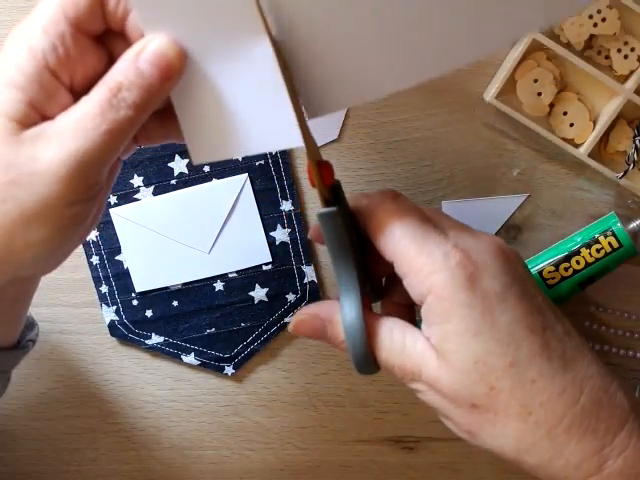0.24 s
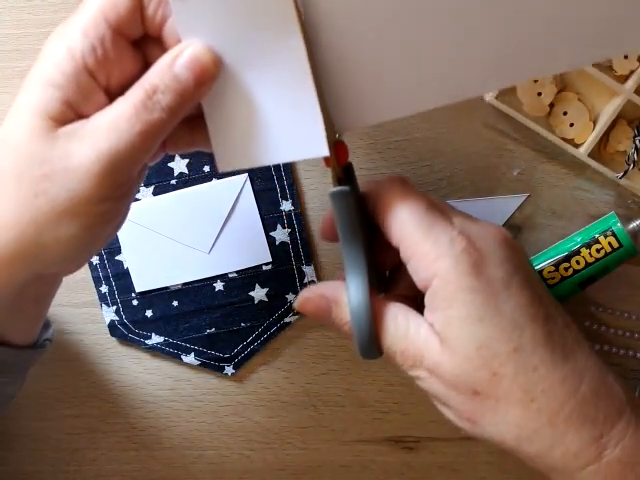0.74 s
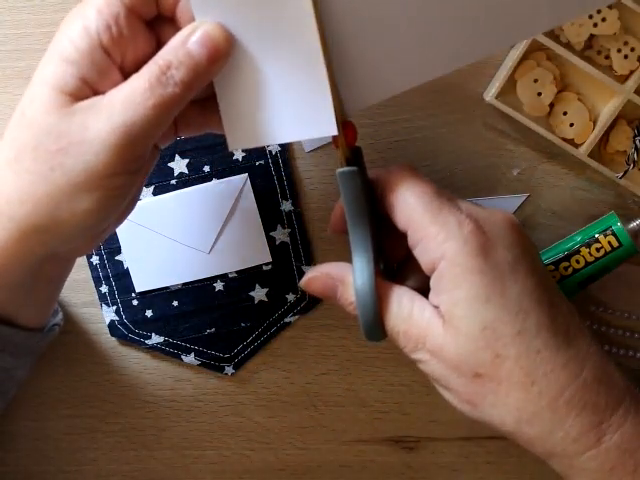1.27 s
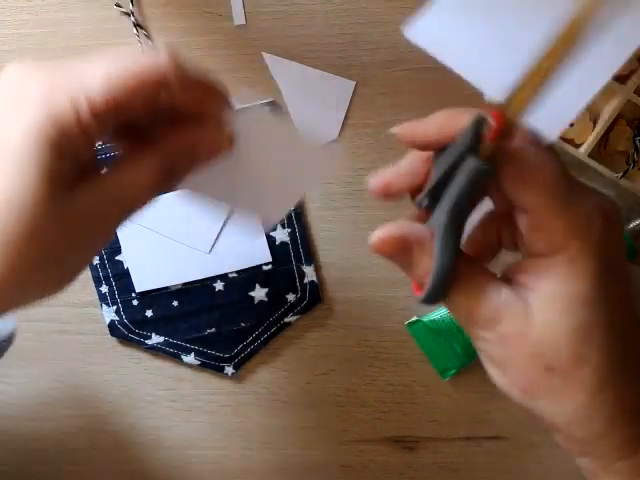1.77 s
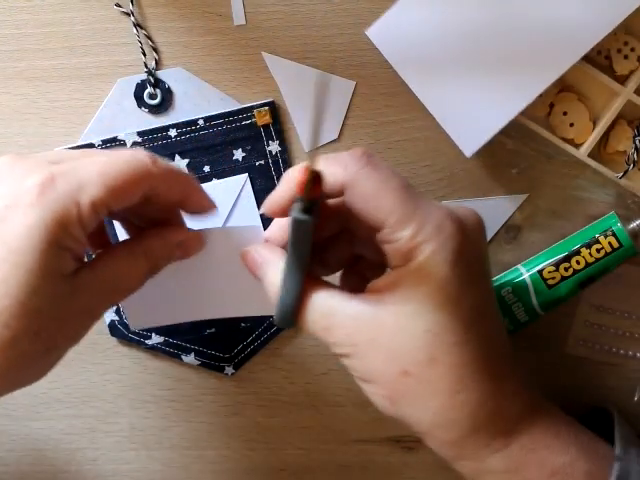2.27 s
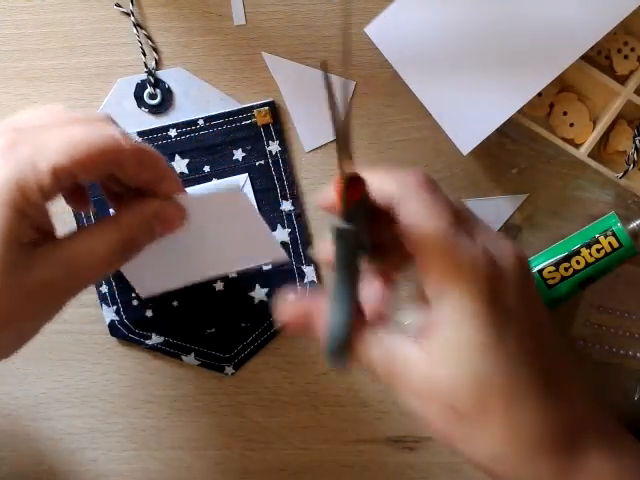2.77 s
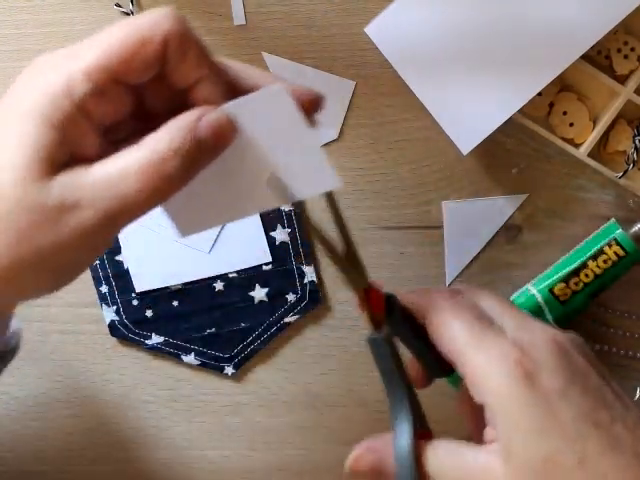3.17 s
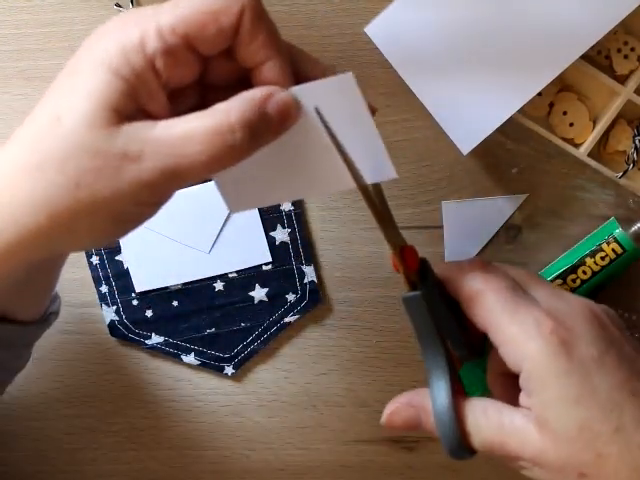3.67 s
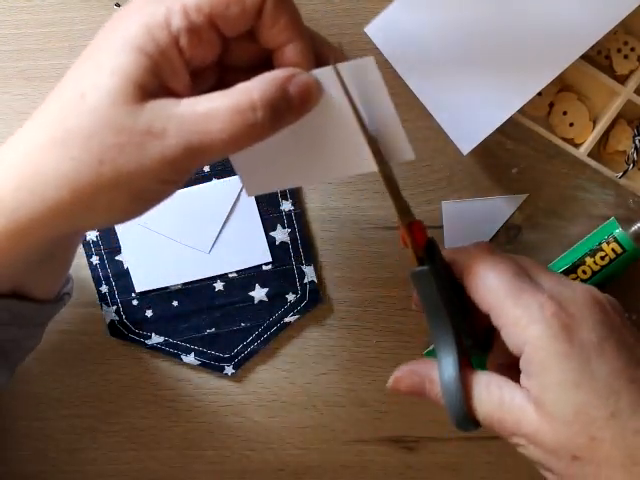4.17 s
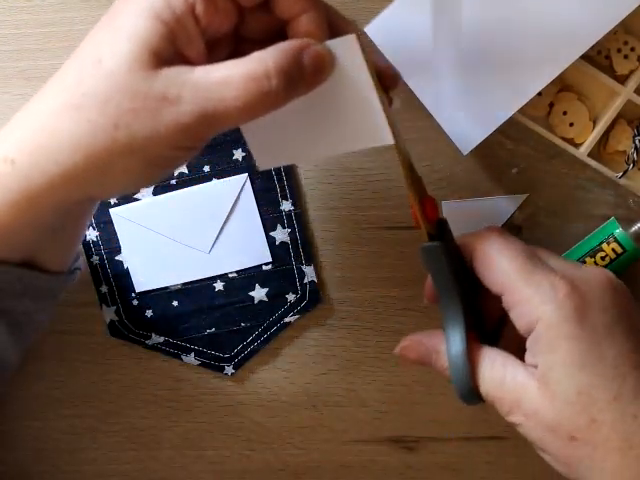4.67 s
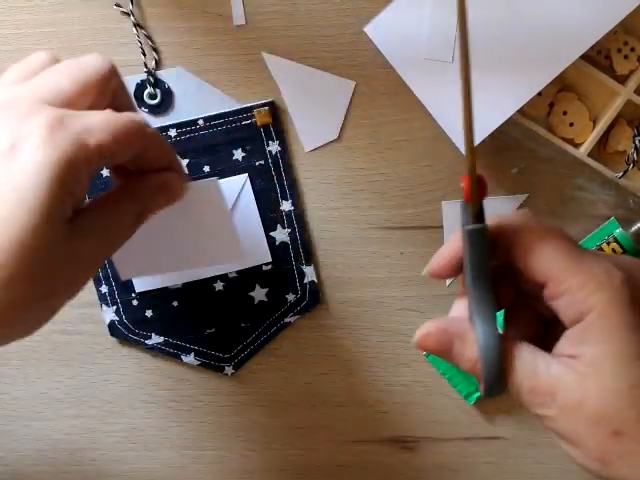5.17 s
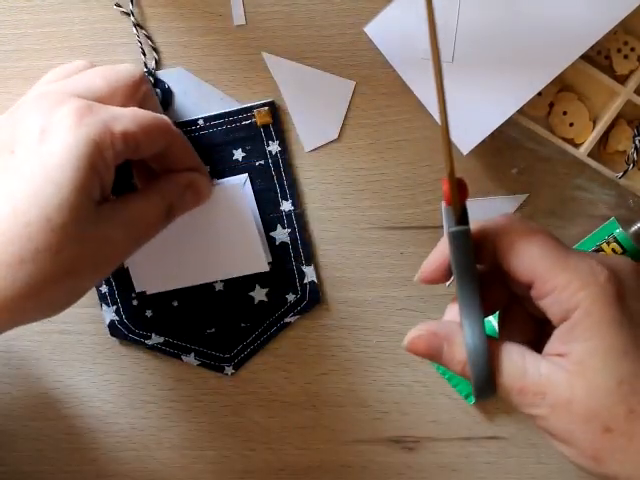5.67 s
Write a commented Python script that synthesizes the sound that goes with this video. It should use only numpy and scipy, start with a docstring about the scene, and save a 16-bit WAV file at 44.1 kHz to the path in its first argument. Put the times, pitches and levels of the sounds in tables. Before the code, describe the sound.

Close up in a small quiet room, scissors crunch unevenly through stiff card and close with a loud double snip near 1.5 seconds. The loose card flexes and taps, sliding softly over cloth and wood. A hand bumps the table with low thuds around 3.1 seconds. A second, quieter and finer cut starts after 4.2 seconds, cracks through and snaps shut near 4.8, followed by card taps and a soft rub.

```python
"""Scissors make two cuts through stiff card, close above a wooden table in a small room.
The card gives way in short crunching steps: noise bursts ring the held card. Each cut ends in a loud snip,
where bursts ring the steel. A fine rasp and a low grip rumble follow each run of crunching steps.
Around the cuts, bursts ring the loose card as it is flexed, put down and picked up, and the table as a hand bumps it.
Coloured noise makes the sliding and the room tone, with a faint hum; noise-built echoes make the room."""
import sys
import numpy as np
from scipy import signal
from scipy.fft import rfft, irfft, next_fast_len
from scipy.io import wavfile

SR = 44100
rng = np.random.default_rng(int(sys.argv[2]) if len(sys.argv) > 2 else 0)


def unload_wav(signal):
    """Save mono or channel-first audio to the path in sys.argv[1] as 16-bit WAV at rate SR, clipped to [-1, 1]."""
    wavfile.write(
        sys.argv[1],
        SR,
        np.round(np.clip(np.atleast_2d(signal).T, -1, 1) * 32767).astype(np.int16),
    )


N = 261689   # samples
TIME = np.arange(N) / SR   # seconds

# Every event level below is relative: contact balances and source trims are added to it.
# Runs of crunching steps within the cuts, some a single step: (t/s, travel/s, number of steps, step length/s,
# first level/dB, last level/dB, weight (extra bass) level/dB, brightness (extra treble) level/dB)
CRUNCH_RUNS = [(0.025, 0.0091, 1, 0.0056, -42.5, -41, -0.5, -0.5),
               (0.0503, 0.0282, 2, 0.0036, -41.5, -42, 3.5, 3),
               (0.098, 0.024, 2, 0.0049, -45.5, -44.5, 3, 3),
               (0.7768, 0.072, 3, 0.0067, -48.5, -44.5, 0.5, 2),
               (0.981, 0.002, 1, 0.0037, -45.5, -45, 1.5, 1.5),
               (1.0473, 0.027, 2, 0.0053, -43, -45, 6, 1.5),
               (1.1992, 0.0465, 2, 0.0021, -43.5, -46.5, -2, -5.5),
               (1.3, 0.031, 2, 0.0028, -38, -39, -4, -10.5), (4.217, 0.073, 3, 0.009, -61, -59.5, 4, 10),
               (4.329, 0.0416, 2, 0.0052, -52, -50.5, -3, 9), (4.4066, 0, 1, 0.0087, -56, -56, 4, 6),
               (4.4362, 0.077, 3, 0.0036, -48, -48, 0, 7), (4.5384, 0, 1, 0.004, -43, -44, -1, 1),
               (4.5724, 0, 1, 0.0013, -41, -41, -4, -6)]
# Where each cut begins and how high the card rings there: (t/s, f/Hz)
CUTS = [(0.0, 884), (4.2, 940)]
RING_RISE_HZ_PER_S = 357   # the card rings higher as the cut advances
CRUNCH_BALANCE = (-7.5, -1.5, -2.5, -11)   # dB in bass, low middle, high middle, treble; same order below


def crunch_steps(jitter_s=0.0004, spread_db=0.6):
    """The blades stick and slip, at a nearly steady pace within a run; every slip breaks a bundle of fibres."""
    for start, travel, steps, length, first_db, last_db, weight_db, bright_db in CRUNCH_RUNS:
        cut_start, cut_hz = min(CUTS, key=lambda cut: abs(cut[0] - start))
        for along in np.linspace(0, 1, round(steps)):
            late, strong = rng.standard_normal(2)
            s = max(start + along * travel + jitter_s * late, 0)
            db = first_db + along * (last_db - first_db) + spread_db * strong
            ring_hz = cut_hz + RING_RISE_HZ_PER_S * (s - cut_start)
            yield contact(s, length, ring_hz, db, CRUNCH_BALANCE, weight_db, bright_db)


# Resonances of the card held in the hand: (f/Hz, width/Hz, level/dB)
HELD_CARD_MODES = [(490, 59, 10), (660, 69, 9.5), (860, 55, 4), (983, 38, 9.5), (1147, 124, 4),
                   (1705, 140, 1.5), (2460, 1300, 8.5), (3340, 490, 7), (9300, 1300, 8.5),
                   (11900, 2500, 11.5)]


def crunching():
    """Breaking fibres shake the held card, which rings at its own pitches."""
    crunch = bursts(crunch_steps(), HELD_CARD_MODES, grit_db=7.5, crack_db=-9.5, ring_db=3.0, ring_width=140,
                    low_hz=370, dull_hz=14000, thud_db=-14, rise_share=0.6)
    return from_db(-0.95) * crunch


# The end of each cut: (tear t/s, tear level/dB, crack level/dB, slam t/s, slam level/dB,
# rebound t/s, rebound level/dB, brightness level/dB)
SNIPS = [(1.4898, -30, -36, 1.5319, -20, 1.5384, -20.5, -3),
         (4.6391, -38, -33.5, 4.7712, -21.5, 4.7815, -40, 4.5)]
# The phases of a snip: (length/s, ringing f/Hz)
TEAR, CRACK, SHEAR = (0.0045, 1850), (0.00106, 2550), (0.0035, 2800)
SLAM, REBOUND = (0.0008, 2580), (0.00035, 2060)
TEAR_BALANCE, CRACK_BALANCE = (-6, -1.5, 0.5, -10), (-13.5, -18, -0.5, -14)
SHEAR_BALANCE, SLAM_BALANCE = (-5, 5, -2, 2), (-13.5, -10.5, 0, -5)
REBOUND_BALANCE = (-24, -8.5, 2, -40)
CRACK_LAG_S = 0.0039   # the last fibres crack just after the tear begins
SHEAR_LEAD_S, SHEAR_DB = 0.003, -13   # steel slides on steel before the slam; level against the slam


def snip_phases():
    """The edge tears and cracks, the freed blades shear past each other, slam shut and rebound."""
    for tear_s, tear_db, crack_db, slam_s, slam_db, rebound_s, rebound_db, bright_db in SNIPS:
        yield contact(tear_s, *TEAR, tear_db, TEAR_BALANCE, bright_db=bright_db)
        yield contact(tear_s + CRACK_LAG_S, *CRACK, crack_db, CRACK_BALANCE, bright_db=bright_db)
        yield contact(slam_s - SHEAR_LEAD_S, *SHEAR, slam_db + SHEAR_DB, SHEAR_BALANCE, bright_db=bright_db)
        yield contact(slam_s, *SLAM, slam_db, SLAM_BALANCE, bright_db=bright_db)
        yield contact(rebound_s, *REBOUND, rebound_db, REBOUND_BALANCE, bright_db=bright_db)


# Resonances of the scissors: (f/Hz, width/Hz, level/dB)
SCISSOR_MODES = [(471, 38, 15.5), (616, 77, 8.5), (804, 120, -1), (986, 74, 0), (1327, 42, 6.5),
                 (1534, 160, 1.5), (1970, 100, 4), (2500, 130, 5.5), (2660, 200, 5), (3630, 520, -0.5),
                 (5100, 500, -13), (8800, 1100, -10)]


def snipping():
    """The blades break through and close, and the steel rings."""
    snip = bursts(snip_phases(), SCISSOR_MODES, grit_db=4.0, crack_db=-7.5, ring_db=0.5, ring_width=600,
                  low_hz=290, dull_hz=6800, thud_db=-14, rise_share=0.45)
    return from_db(-0.5) * snip


RUN_FADE_S = 0.044   # fade in and fade out around each run of steps


def along_crunch_runs(db, per_brightness):
    """Gain over time of a sound that lasts through each run of steps and grows with its brightness."""
    gain = np.zeros(N)
    for start, travel, *_, bright_db in CRUNCH_RUNS:
        level = from_db(db + per_brightness * bright_db)
        gain += level * swell(start - RUN_FADE_S / 2, RUN_FADE_S, travel, RUN_FADE_S)
    return gain


# Colour of card scraping on steel, relative power per Hz: (f/Hz, level/dB)
RASP_COLOUR = [(3000, -29), (4800, -3), (6200, 3), (7600, -8), (9500, 1), (11000, -27), (16000, -26)]
RASP_DB, RASP_PER_BRIGHTNESS = -67.5, 0.88   # base level; dB more per dB of brightness


def rasping(patchy_db=8.5, patch_hz=160):
    """The cut edge scrapes along the steel with a fine bright grain."""
    patches = rms_one(butter(rng.standard_normal(N), patch_hz, "low"))
    grain = from_db(patchy_db * np.tanh(patches))
    return along_crunch_runs(RASP_DB, RASP_PER_BRIGHTNESS) * grain * diffuse_noise(RASP_COLOUR)


GRIP_DB, GRIP_PER_BRIGHTNESS = -69, 0.66   # base level; dB more per dB of brightness


def grip():
    """Low rumble of the hand on the handles."""
    rumble = rms_one(butter(rng.standard_normal(N), [72, 135], "band"))
    return along_crunch_runs(GRIP_DB, GRIP_PER_BRIGHTNESS) * rumble


# Loose card flaps and touches down; weight lifts the lows, sharpness the treble:
# (t/s, length/s, ringing f/Hz, level/dB, weight level/dB, sharpness level/dB)
CARD_TAPS = [(0.3898, 0.0081, 2280, -43.5, 3, 7), (0.41, 0.016, 660, -45, 10, 10),
             (0.459, 0.008, 1040, -33, 7.5, 7), (0.4857, 0.0022, 473, -50, 16.5, 4),
             (1.6863, 0.009, 2000, -47.5, 1, -6), (1.701, 0.0056, 1400, -39.5, 5, -4),
             (1.8211, 0.011, 5300, -40, -6, 8), (1.8522, 0.0019, 2600, -30, 2, -7),
             (1.8654, 0.0017, 2070, -30, 1, -3), (1.913, 0.0015, 1810, -30, -7, 3),
             (1.9248, 0.0029, 1930, -44, 14, 17), (1.9578, 0.0035, 2000, -42, 12, -7),
             (1.982, 0.003, 1790, -40, 0.5, -7), (2.1144, 0.0095, 1650, -32, -7, 0),
             (2.1216, 0.0024, 1731, -28, -3, 1), (2.1321, 0.0034, 1710, -35, -1, 8),
             (2.326, 0.0015, 1800, -54.5, 0, 25.5), (2.509, 0.0025, 1870, -43, -13, -9),
             (2.524, 0.0011, 2030, -50, -4, 14), (2.7425, 0.0024, 2340, -50.5, -3.5, -10),
             (2.8647, 0.0032, 1470, -42, -3, 11), (2.8973, 0.0012, 3580, -58.5, -4, 31.5),
             (4.8457, 0.0029, 1710, -37, -11, 4), (4.859, 0.011, 1690, -35.5, -4.5, 8.5),
             (4.924, 0.0061, 2280, -46, -5, -1)]
# The card flexes with a run of faint ticks: (t/s, length/s, first level/dB, last level/dB)
FLEXES = [(0.3166, 0.022, -53, -51.5), (1.7684, 0.031, -47, -44), (2.05, 0.032, -50, -52),
          (2.1685, 0.0592, -41.5, -50), (2.4185, 0.0021, -53.5, -53)]
TAP_BALANCE, TICK_BALANCE = (-10, -6, 0, -20), (-9.5, -6.5, 0.5, -34)
TICKS_PER_S, TICK_S, TICK_SPREAD_DB = 45, 0.0027, 0.8
TICK_HZ, TICK_SPREAD_OCTAVES = 2120, 0.24


def card_contacts():
    """Single taps of the loose card, and the ticks of its flexing."""
    for s, length, ring_hz, db, weight_db, sharp_db in CARD_TAPS:
        yield contact(s, length, ring_hz, db, TAP_BALANCE, weight_db, sharp_db)
    for start, length, first_db, last_db in FLEXES:
        for along in np.linspace(0, 1, 1 + round(length * TICKS_PER_S)):
            pitch, strong = rng.standard_normal(2)
            db = first_db + along * (last_db - first_db) + TICK_SPREAD_DB * strong
            ring_hz = TICK_HZ * 2 ** (TICK_SPREAD_OCTAVES * pitch)
            yield contact(start + along * length, TICK_S, ring_hz, db, TICK_BALANCE)


# Resonances of the loose card: (f/Hz, width/Hz, level/dB)
LOOSE_CARD_MODES = [(350, 30, 2.5), (435, 23, 10.7), (627, 23, 3), (959, 53, 4.4), (1453, 70, 1.8),
                    (1745, 62, 1.4), (2310, 530, 2.1), (3010, 840, 0.34), (5630, 100, 1.1)]


def card_handling():
    """Taps and ticks ring the loose card, duller than the cut."""
    taps = bursts(card_contacts(), LOOSE_CARD_MODES, grit_db=9.5, crack_db=-8.0, ring_db=4.0, ring_width=260,
                  low_hz=240, dull_hz=2540, thud_db=-25.5)
    return from_db(0.9) * taps


# The hand knocks on the table and settles:
# (t/s, length/s, ringing f/Hz, level/dB, weight level/dB, sharpness level/dB)
BUMPS = [(3.1288, 0.0033, 380, -33, -2.5, 0), (3.1441, 0.0045, 121, -41.5, 0, 0),
         (3.163, 0.0112, 130, -41, 3, 2), (3.191, 0.01, 367, -38, -1, -1), (3.214, 0.011, 370, -46, 5, 0),
         (3.3696, 0.0104, 185, -47.5, 2.5, 0)]
BUMP_BALANCE = (0.5, -13, -14, -24)


def table_knocks():
    """The hand meets the table top."""
    for s, length, ring_hz, db, weight_db, sharp_db in BUMPS:
        yield contact(s, length, ring_hz, db, BUMP_BALANCE, weight_db, sharp_db)


# Resonances of the table top: (f/Hz, width/Hz, level/dB)
TABLE_MODES = [(113, 13, 24.6), (181, 27, 23.4), (262, 64, 9.6), (346, 62, 19), (422, 54, 6.3),
               (644, 120, 2.7), (1100, 180, 5.2)]


def table_bumping():
    """Knocks set the table top ringing in low thuds."""
    thuds = bursts(table_knocks(), TABLE_MODES, grit_db=0.0, crack_db=-2.0, ring_db=0, ring_width=48,
                   low_hz=70, dull_hz=3020, thud_db=-11.5)
    return from_db(-0.4) * thuds


# Card and fingers slide over cloth and wood:
# (t/s, attack/s, hold/s, release/s, rub level/dB, hiss level/dB, pressing level/dB)
SLIDES = [(0.436, 0.051, 0.085, 0.055, -39.5, -39.5, -52), (1.74, 0.08, 0.61, 0.27, -50, -50, -62),
          (2.783, 0.079, 0.25, 0.54, -55, -50, -72), (4.156, 0.068, 0.385, 0.05, -57.5, -60.5, -72),
          (4.92, 0.27, 0.093, 0.22, -53, -47.5, -56)]
# Colours of the rub, the hiss and the pressing, relative power per Hz: (f/Hz, level/dB)
RUB = [(90, -11), (150, -3), (195, 6.5), (270, 0), (440, 3), (950, -0.5), (1800, -2), (3000, -37)]
HISS = [(900, -24), (2000, 1), (3800, 0.5), (6000, -3.5), (9000, -5.5), (15000, -22)]
PRESS_COLOUR = [(100, -23), (185, 1), (260, -4.5), (360, -3), (520, -19), (1000, -41)]


def sliding(patchy_db=0.5, patch_hz=70):
    """Card and skin rub over cloth and wood, catching unevenly; pressing fingers add a low rumble."""
    gains = np.zeros((3, N))
    for s, attack, hold, release, *levels in SLIDES:
        gains += from_db(levels)[:, None] * swell(s, attack, hold, release)
    rub, hiss, press = gains
    catch = from_db(patchy_db * rms_one(butter(rng.standard_normal(N), patch_hz, "low")))
    friction = from_db(-5) * rub * diffuse_noise(RUB) + from_db(-6.5) * hiss * diffuse_noise(HISS)
    return catch * friction + from_db(-4.0) * press * diffuse_noise(PRESS_COLOUR)


# Colour of the room noise, relative power per Hz: (f/Hz, level/dB)
ROOM_TONE = [(25, -17), (55, -9.5), (100, -6), (170, -2.5), (260, -5.5), (400, -4.5), (850, -5),
             (1500, -8.5), (2900, -11.5), (5000, -13.5), (10000, -20), (16000, -29)]
ROOM_TONE_DB = -56
# Faint hum of an appliance: (f/Hz, level/dB)
HUM = [(104, -77.5), (181, -76.5), (350, -71.5), (538, -70.5), (705, -79), (807, -75.5), (840, -69.5),
       (1448, -77)]


def background():
    """Steady room noise with a few wavering hum lines, each made of noise in a very narrow resonance."""
    hum = 0
    for hz, db in HUM:
        hum = hum + from_db(db) * rms_one(resonate(rng.standard_normal(N), hz, 3.7))
    return from_db(ROOM_TONE_DB) * diffuse_noise(ROOM_TONE) + hum


# Time for echoes to fall by 60 dB: (f/Hz, t/s)
ROOM_T60 = [(150, .28), (600, .22), (2500, .21), (6000, .21), (14000, .16)]
# Strength of the reverberation: (f/Hz, level/dB)
ROOM_WET = [(150, -4), (600, -4), (2500, -3.5), (6000, -2), (14000, -5.5)]
# Likeness of left and right in the reflections: (f/Hz, likeness 0-1)
ROOM_LIKENESS = [(100, 0.75), (400, 0.8), (1200, 1), (3000, 0.48), (8000, 0.23), (15000, 0)]


def room(directions, first_echo_s=0.0047, early_db=0.0, early_s=0.014):
    """Each direction meets its own echoes: strong early ones off the table, then a tail dying faster in the treble."""
    size, out = SR // 3, 0
    age = TIME[:size]
    arrival = np.clip(age / first_echo_s - .5, 0, 1)
    build_up = arrival * (1 + from_db(early_db) * np.exp(-age / early_s))
    edges = np.geomspace(70, 18000, 9)   # Hz
    for x in directions:
        response = 0
        for low, high in zip(edges, edges[1:]):
            hz = np.sqrt(low * high)
            flat_noise = diffuse_noise([(1, 0), (SR, 0)], ROOM_LIKENESS, size=size)
            band = butter(flat_noise, [low, high], "band", order=3)
            tail = rms_one(band * build_up * from_db(-60 * age / at_hz(ROOM_T60, hz)))
            # wider bands carry more energy
            band_share = np.sqrt(2 * (high - low) / SR / size)
            response = response + from_db(at_hz(ROOM_WET, hz)) * tail * band_share
        out = out + signal.oaconvolve(x[None], response, axes=1)[:, :N]
    return out / np.sqrt(len(directions))


# Left minus right: (f/Hz, level/dB)
LEFT_DB = [(100, -2), (700, -3.5), (1300, -3.5), (2400, -2), (4400, -1), (15000, -1.3)]
# Phase by which the left leads: (f/Hz, phase/radians)
LEFT_LEAD = [(100, 0.0083), (1000, 0.35), (2900, 0.74), (6000, 0.1), (14000, 0.82)]


def microphones(x):
    """Two close ports: the right is a little louder, the left a little earlier."""
    padded = next_fast_len(N, True)
    hz = np.arange(padded // 2 + 1) * SR / padded
    # each side takes half of the difference
    half = from_db(at_hz(LEFT_DB, hz) / 2) * np.exp(1j * at_hz(LEFT_LEAD, hz) / 2)
    return irfft(rfft(x, padded) * np.array([half, 1 / half]), padded)[:, :N]


def from_db(db):
    """Decibels to gain."""
    return 10 ** (np.asarray(db) / 20)


def rms_one(x):
    """Scale each row to an rms (average strength) of 1."""
    return x / np.sqrt(np.mean(x ** 2, axis=-1, keepdims=True) + 1e-20)


def at_hz(points, hz):
    """Read a table on a log-frequency axis."""
    table = np.array(points)
    return np.interp(np.log(np.maximum(hz, 1)), np.log(table[:, 0]), table[:, 1])


def butter(x, hz, kind, order=2):
    """Causal Butterworth filter."""
    return signal.sosfilt(signal.butter(order, np.minimum(hz, SR / 2 - 1), kind, fs=SR, output="sos"), x)


def resonate(x, hz, width):
    """One resonance with gain 1 on top; a narrow width rings longer."""
    r = np.exp(-np.pi * width / SR)
    feedback = [1, -2 * r * np.cos(2 * np.pi * hz / SR), r * r]
    return signal.lfilter(np.array([1, 0, -1]) * (1 - r * r) / 2, feedback, x)


def swell(s, attack, hold, release):
    """Gain over time that rises, holds and falls."""
    rise = (TIME - s) / max(attack, 1e-3)
    fall = 1 - (TIME - s - attack - hold) / max(release, 1e-3)
    return np.clip(np.minimum(rise, fall), 0, 1)


def contact(s, length, ring_hz, db, balance, weight_db=0, bright_db=0, low_middle_share=0.86):
    """One burst: time, length, ringing pitch and the level in each band."""
    tilt = [weight_db, low_middle_share * weight_db, 0, bright_db]
    return (s, length, ring_hz, *(db + np.array(balance) + tilt))


# Likeness of left and right in diffuse sound: (f/Hz, likeness 0-1)
LIKENESS = [(40, 0.23), (100, 0.093), (300, 0.097), (1000, 0.1), (3000, 0.083), (8000, 0.086),
            (15000, 0.15)]


def diffuse_noise(spectrum, likeness=LIKENESS, size=N):
    """Stereo noise of a given colour whose sides are partly alike; rms 1."""
    padded = next_fast_len(size, True)
    hz = np.arange(padded // 2 + 1) * SR / padded
    mid, side = rfft(rng.standard_normal((2, padded)))
    alike = np.clip(at_hz(likeness, hz), 0, 1)
    both = np.sqrt(1 + alike) * mid + np.sqrt(1 - alike) * side * [[1], [-1]]
    return rms_one(irfft(both * from_db(at_hz(spectrum, hz)), padded)[:, :size])


# The four bands of an event, bass to treble: (low f/Hz, high f/Hz)
BANDS = [(100, 700), (700, 1600), (1600, 4500), (4500, 16000)]


def bursts(events, modes, grit_db, crack_db, ring_db, ring_width, low_hz, dull_hz, thud_db, rise_share=.3, count=3):
    """Each event is a crack and a swarm of tiny slips ringing a body; one row per direction of radiation."""
    out, size = np.zeros((count, N + SR)), SR // 8
    splits = [signal.butter(2, band, "band", fs=SR, output="sos") for band in BANDS]
    for s, length, ring_hz, *levels in events:
        age = TIME[:size] / max(length, 1e-4)   # in event lengths
        slips, sizes = rng.standard_normal((2, count, size))
        envelope = (1 - np.exp(-age / rise_share)) * np.exp(-np.minimum(0.71 * age, 20))
        force = slips * from_db(grit_db * np.clip(sizes, -2, 2)) * envelope
        # the sharpest slip comes just as the swarm swells
        crack_at = np.argmax(envelope > envelope.max() / 2)
        force[:, crack_at] += from_db(crack_db) * np.linalg.norm(force, axis=1)
        body = force + sum(from_db(db) * resonate(force, hz, width) for hz, width, db in modes)
        # each event also has a resonance of its own
        body = body + from_db(ring_db) * resonate(body, ring_hz, ring_width)
        body = butter(butter(body, low_hz, "high"), dull_hz, "low", order=1)
        sound = 0
        for k, db in enumerate(levels):
            # alternating signs let neighbouring bands join smoothly
            sound = sound + (-1) ** k * from_db(db) * rms_one(signal.sosfilt(splits[k], body))
        # the jolt also reaches the hands and the table as a low thud
        thud = butter(resonate(envelope * rng.standard_normal(size), 107.0, 28), 190, "low")
        sound = sound + from_db(levels[0] + thud_db) * rms_one(thud)
        # band levels are those of the same energy spread over 10 ms
        start = int(s * SR)
        out[:, start:start + size] += sound * np.sqrt(.01 * SR / size)
    return out[:, :N]


def scene():
    """The first direction reaches the microphones directly; all of them excite the room."""
    directions = crunching() + snipping() + card_handling() + table_bumping()
    contacts = directions[0] + room(directions)
    return microphones(contacts + rasping() + grip() + sliding() + background())


CUTOFF_HZ = 16700


def record(dry):
    """Peaks beyond full scale are flattened and the top treble is cut."""
    low_pass = signal.cheby2(16, 60, CUTOFF_HZ, fs=SR, output="sos")
    return signal.sosfilt(low_pass, np.clip(dry, -1, 1))


dry = scene()
out = record(dry)
unload_wav(out)
```